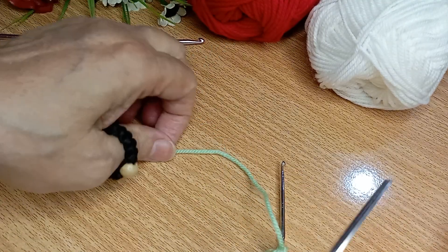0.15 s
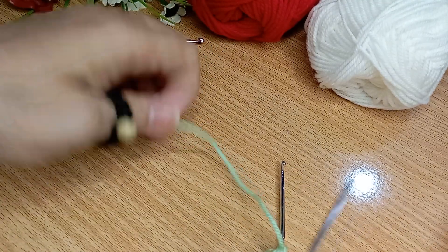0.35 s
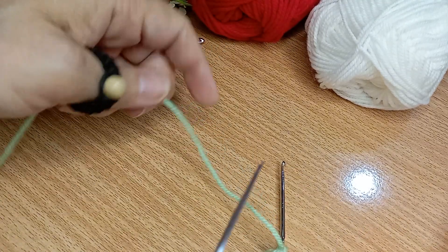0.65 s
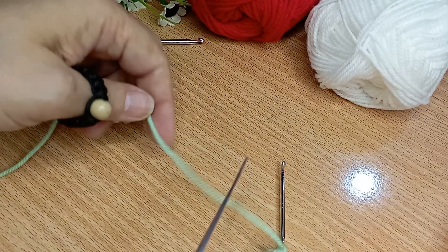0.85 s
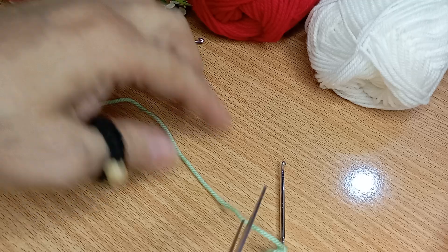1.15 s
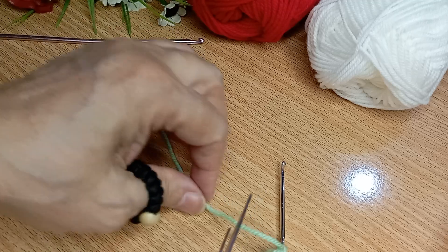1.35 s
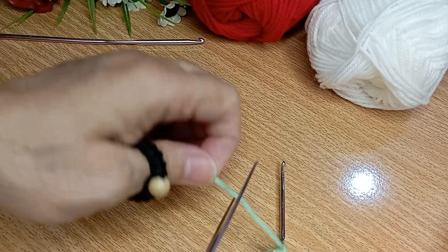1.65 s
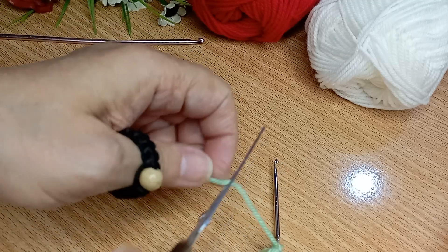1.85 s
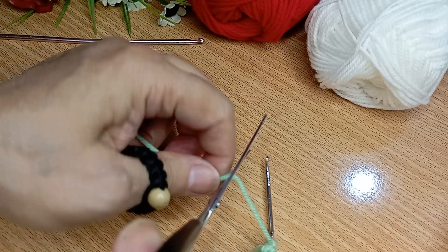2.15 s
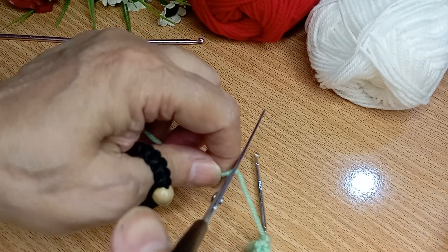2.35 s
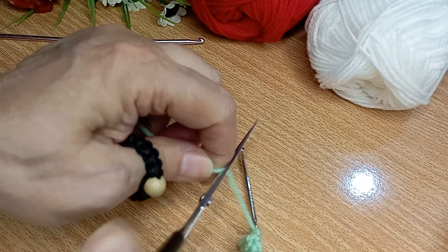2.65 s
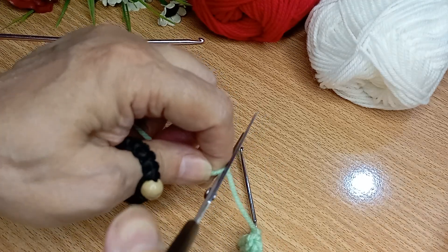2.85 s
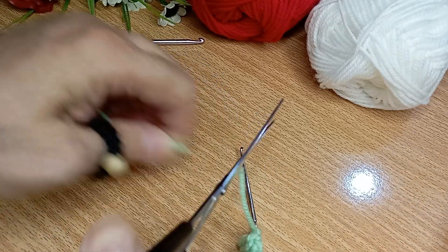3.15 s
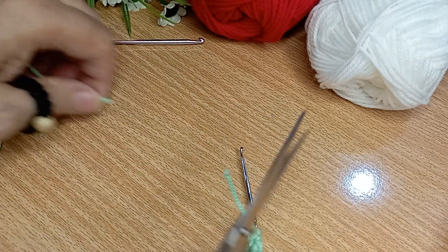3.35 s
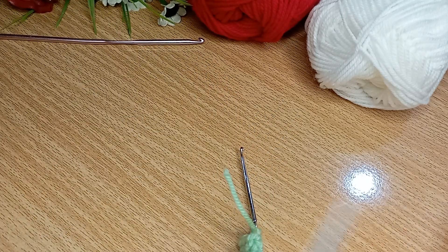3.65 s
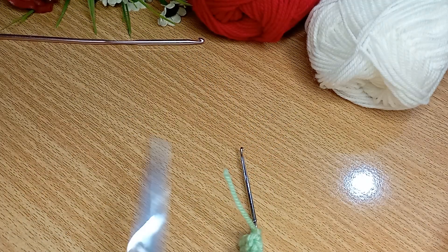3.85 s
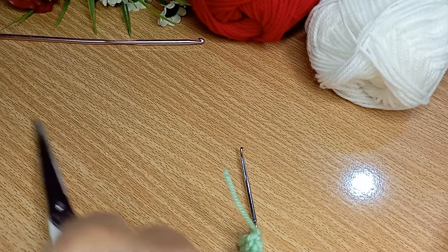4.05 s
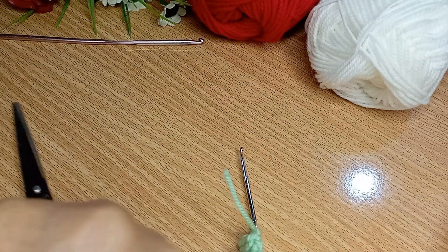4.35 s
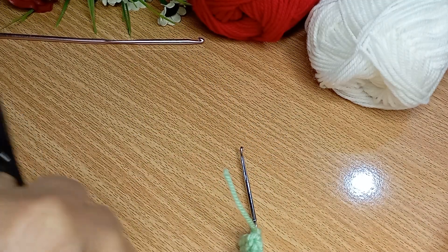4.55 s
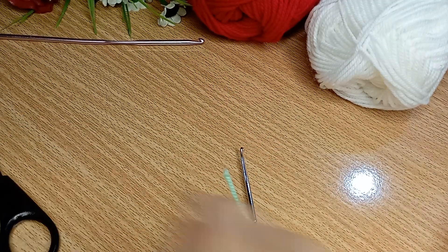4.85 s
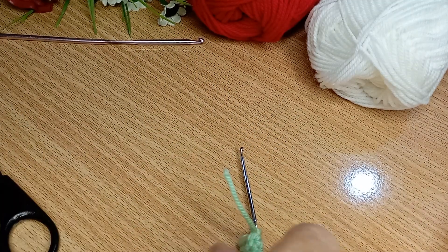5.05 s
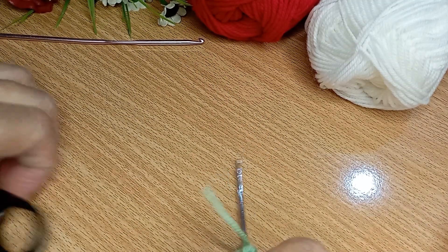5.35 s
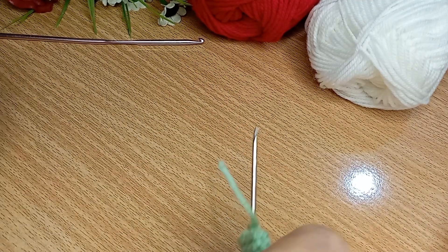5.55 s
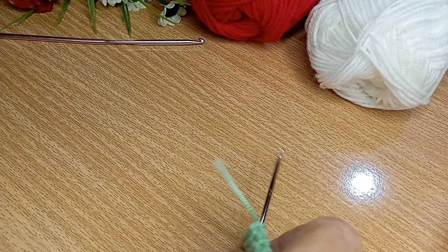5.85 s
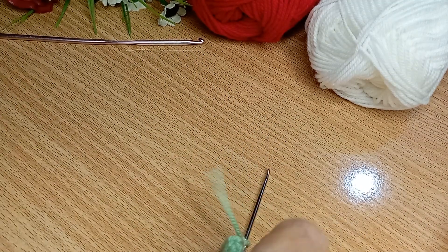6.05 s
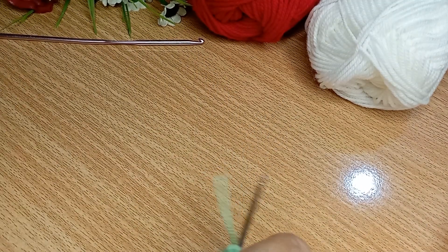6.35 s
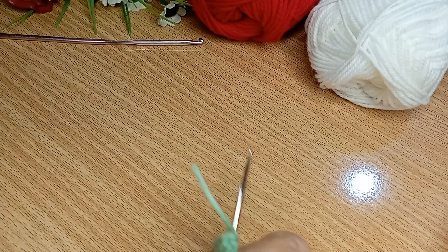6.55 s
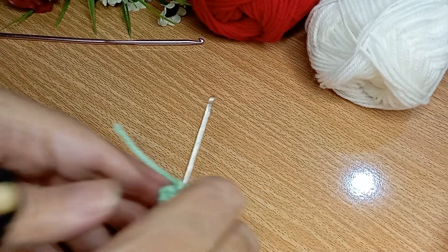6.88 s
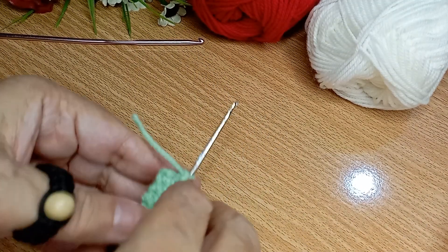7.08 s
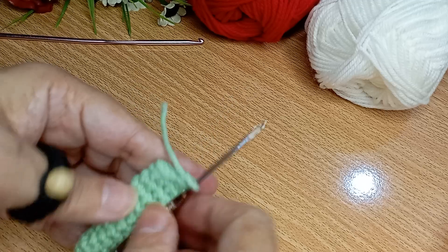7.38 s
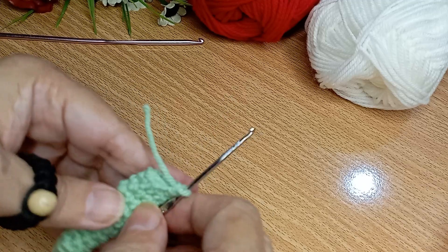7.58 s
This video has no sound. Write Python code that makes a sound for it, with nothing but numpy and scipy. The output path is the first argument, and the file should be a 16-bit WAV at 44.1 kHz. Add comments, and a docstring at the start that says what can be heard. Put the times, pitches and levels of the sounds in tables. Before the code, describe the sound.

A close stereo microphone hears a wooden tabletop in a small, hard-walled room with dull air noise and a steady low hum. Two soft muffled bumps come at about 0.1 s, then low hand brushing until 1.4 s, with barely audible blade ticks from 0.5 s. Clearer, thin, dry scissor snips come at 2.45 s, with weaker clicks to 3.3 s and another crisp one at 3.65 s. The scissors clack onto wood at 4.05 and 4.35 s, steel bright over a woody knock. A short rub leads into the loudest sharp clatter at 5.15 to 5.4 s. A steel hook taps and bounces at 5.9, 6.0, 6.3, 6.45 and 6.55 s, with a brief hiss of fibre near 6.0 s. Fainter touches follow, then a softer tap at 7.35 s, a quick wool rub, and a second low tone swelling from 7 s to the end.

```python
"""Scissors, yarn and a hook on a wooden table

Small scissors snip yarn, then are put down; a steel crochet hook clatters on the table; hands and wool rub.
Contacts are damped noise bursts through steel and wood colours, with bounces and ringing modes; rubbing and
brushing are noise shaped by smooth strokes. A close stereo microphone hears them in a small, hard-walled
room, over dull room noise, a low hum and a second low tone that swells late."""
import sys
import numpy as np
from scipy import signal
from scipy.fft import rfft, irfft, next_fast_len
from scipy.io import wavfile
from scipy.ndimage import map_coordinates

SR = 44100
rng = np.random.default_rng(int(sys.argv[2]) if len(sys.argv) > 2 else 0)


def store_wav(level_fs):
    """Save 16-bit WAV to argv[1]."""
    pcm = np.round(np.clip(np.atleast_2d(level_fs), -1, 1) * 32767)
    wavfile.write(sys.argv[1], SR, pcm.T.astype(np.int16))


N = 340452
TIME = np.arange(N) / SR

# Bright colour of steel in contact. Each row: frequency in Hz, relative level in dB.
STEEL = [(3500, -69.5), (5500, -23.5), (7000, -14), (8800, -10), (9900, -5), (10500, -5), (11200, -3.5),
         (12000, -11.5), (14000, -17), (16000, -24)]
# Middle colour of the rattling tool body. Each row: frequency in Hz, relative level in dB.
BODY = [(600, -35), (1100, -31.5), (1500, -2.5), (2100, -6), (3000, -4), (4400, -9), (5700, -6.5),
        (7500, -33.5), (11000, -56.5)]
# How alike left and right are in the room. Each row: frequency in Hz, likeness (1 is identical).
ROOM_ALIKE = [(150, 0.96), (500, 1), (1200, 0.51), (16000, 0)]


def amp(db):
    """Decibels to gain."""
    return 10 ** (np.asarray(db) / 20)


def unit(x):
    """x at rms 1."""
    return x / np.sqrt(np.mean(x ** 2) + 1e-20)


def along(points, hz):
    """(Hz, value) points read on a log frequency axis."""
    point_hz, values = np.transpose(points)
    return np.interp(np.log(hz + 1), np.log(point_hz + 1), values)


def wobble(rate):
    """A smooth random curve with the given number of knots a second."""
    knots = rng.standard_normal(int(N * rate / SR) + 4)
    return map_coordinates(knots, [TIME * rate])


def filtered(x, response):
    """x times a complex response of frequency."""
    n = x.shape[-1]
    padded = next_fast_len(n + 4096)
    spectrum = rfft(x, padded) * response(np.fft.rfftfreq(padded, 1 / SR))
    return irfft(spectrum, padded)[..., :n]


def coloured(x, spectrum, size=2048):
    """x through a causal, minimum-phase filter with the given spectrum."""
    gain = amp(along(spectrum, np.fft.rfftfreq(size, 1 / SR)))
    cepstrum = irfft(np.log(gain))
    # folding the cepstrum forward puts the filter's energy at its start
    cepstrum[1:size // 2] *= 2
    cepstrum[size // 2 + 1:] = 0
    impulse = irfft(np.exp(rfft(cepstrum)))
    return signal.fftconvolve(x, impulse[None], axes=1)[:, :x.shape[1]]


def pair(n, alike):
    """White stereo noise whose left-right likeness depends on frequency."""
    def mid_side(hz):
        turn = np.arccos(np.clip(along(alike, hz), -1, 1)) / 2
        return np.array([np.cos(turn), np.sin(turn)])

    mid, side = filtered(rng.standard_normal((2, n)), mid_side)
    return np.array([mid + side, mid - side])


def rush(spectrum, alike):
    """Steady coloured stereo noise of rms 1."""
    return unit(filtered(pair(N, alike), lambda hz: amp(along(spectrum, hz))))


def swell(t, length, rise_share):
    """A smooth stroke, loudest at t = 0, with its own shares of rise and fall."""
    side_length = length * np.where(t < 0, rise_share, 1 - rise_share)
    return np.exp(-2 * (t / side_length) ** 2)


def add(track, s, sound):
    """Mix a sound into the track at s seconds."""
    start = max(round(s * SR), 0)
    track[:, start:start + sound.shape[1]] += sound[:, :max(N - start, 0)]


def resonance(f, hz, width):
    """Causal response of one mode, 1 at its centre; width in Hz."""
    return 1j * f * width / (hz * hz - f * f + 1j * f * width)


def peaked(x, hz, width, boost_db):
    """x with one mode standing out; same energy."""
    y = filtered(x, lambda f: 1 + amp(boost_db) * resonance(f, hz, width))
    return y * np.linalg.norm(x) / np.linalg.norm(y)


def in_room(x, wet_db, gap=0.0016):
    """x followed by the walls' answer, each frequency dying at its own speed."""
    # Decay of the room. Each row: frequency in Hz, time to fall 60 dB in seconds.
    room_decay = [(120, 0.23), (300, 0.77), (800, 0.3), (2000, 0.5), (5000, 0.39), (10000, .33),
                  (16000, 0.2)]
    hz, t, cells = signal.stft(pair(SR // 2, ROOM_ALIKE), SR, nperseg=256)
    decay = amp(-60 * t / along(room_decay, hz)[:, None])
    tail = signal.istft(cells * decay, SR, nperseg=256)[1]
    # the answer builds up over about gap seconds
    tail *= 1 - np.exp(-(np.arange(tail.shape[1]) / SR / gap) ** 2)
    tail /= np.linalg.norm(tail[0])
    return x + amp(wet_db) * signal.fftconvolve(x, tail, axes=1)[:, :x.shape[1]]


def placed(x, pan_db, lead=0.0002133):
    """The table lies a little to the left, so the left port hears it lead seconds earlier."""
    sides = np.array([[.5], [-.5]])
    delayed = filtered(x, lambda hz: np.exp(-2j * np.pi * hz * lead * (.5 - sides)))
    return amp(sides * pan_db) * delayed


def burst(spectrum, t60, first_db):
    """A sharp first touch and the dense, heavily damped modes that it starts; energy 1."""
    # How alike left and right are close to a contact. Each row: frequency in Hz, likeness.
    contact_alike = [(300, 0.89), (900, 0.32), (3000, 0.092), (12000, 0.083)]
    t = np.arange(SR // 2) / SR
    modes = pair(len(t), contact_alike) * amp(-60 * t / t60)
    touch = amp(first_db) * (t == 0)
    x = coloured(modes / np.linalg.norm(modes) + touch, spectrum)
    return x / np.linalg.norm(x)


def clacks():
    """Each contact cracks in the steel, rattles its body, knocks the table top and thuds in its frame."""
    # Colour of the struck table top. Each row: frequency in Hz, relative level in dB.
    wood_colour = [(150, -45.5), (370, 5.5), (500, 1), (680, 5), (950, -6), (1400, -8.5), (2000, -18.5),
                   (3500, -52.5)]
    # Colour of the thud in the table's frame. Each row: frequency in Hz, relative level in dB.
    thud_colour = [(35, -9.5), (70, -6.5), (130, 3.5), (190, 4), (300, -1.5), (420, -8.5), (700, -11),
                   (2000, -78.5)]
    track = np.zeros((2, N))
    for s, edge_db, body_db, knock_db, thud_db, hz in contacts():
        spot, side = rng.standard_normal(2)
        crack = amp(edge_db + 0.5) * burst(STEEL, t60=0.022, first_db=-15.5)
        rattle = amp(body_db) * burst(BODY, t60=0.042, first_db=-8.5)
        # the reflection's delay in seconds differs from spot to spot
        delay = 0.000411 * np.exp(0.32 * spot)
        steel = off_table(crack + rattle, strength=0.3, delay=delay) + amp(edge_db - 17) * ring()

        # the spot that is struck decides which mode of the top answers most; higher modes stand out more
        boost_db = -0.5 + 4 * np.log2(hz / 500)
        top = peaked(burst(wood_colour, t60=0.039, first_db=-4.0), hz, width=hz / 5.6, boost_db=boost_db)
        thud = burst(thud_colour, t60=0.037, first_db=-1.5)
        table = amp(knock_db + 1) * top + amp(thud_db) * thud

        # left minus right: 0.5 dB on average, scattered by 2.7 dB from blow to blow
        add(track, s, placed(in_room(steel, wet_db=-9.0), pan_db=0.5 + 2.7 * side))
        add(track, s, placed(in_room(table, wet_db=-5.0), pan_db=1.5, lead=0.00017))
    return track


def contacts(count=3):
    """Every landing grazes, hits and bounces, each time sooner and weaker."""
    # Scissors, hook and hand landing on the table. Each row: hit in seconds, relative levels of steel, rattle,
    # knock and thud in dB, knock resonance in Hz, first flight in seconds, loss a bounce in dB.
    landings = [(0.0765, -35, -32, -22, -6.5, 330, .012, 19), (0.087, -22, -25, -16.5, -3.5, 300, .01, 12),
                (4.057, -1, -10, -7.5, -4, 770, 0.017, 5.5), (4.1152, -7, -11.5, -10, -27, 693, 0.009, 24),
                (4.3573, 2.5, -4, -3.5, -1, 890, 0.013, 13.5),
                (5.1375, -30, -28, -16.5, -7, 330, 0.013, 15), (5.1818, -11, -16, -6, 0.5, 403, 0.0046, 2),
                (5.23, 10.5, 1.5, 1.5, -1.5, 1110, 0.0086, 18),
                (5.3848, 1.5, -10, -6.5, -4.5, 344, .012, 9), (5.9203, -0.5, -7, -5, -11, 520, 0.012, 20),
                (5.9723, 5.5, -4.5, -3.5, -4.5, 1500, 0.028, 10),
                (6.1169, -20.5, -20, -21.5, -18, 414, .01, 20), (6.273, 5, -2.5, -5, -2, 780, .044, 6.5),
                (6.4357, -3.5, -7, -8, -7.5, 1530, .012, 7), (6.5369, 6, -2.5, -5, -1, 845, .0278, 3.5),
                (6.8128, -15.5, -23, -20, -22, 513, 0.012, 0.5),
                (6.9356, -26, -29, -26, -43.5, 490, 0.013, 3.5),
                (7.343, -4.5, -11, -13.5, -11, 494, .0285, 2.5)]
    graze_s, graze_db = .003, -27  # the steel grazes the table just before it lands
    shrink = 0.78  # each flight over the one before
    extra_loss_db = np.array([0, 0, 0, 1.5])  # the thud loses more a bounce
    for s, steel, rattle, knock, thud, hz, flight, loss in landings:
        levels = np.array([steel, rattle, knock, thud])
        yield s - graze_s, *(levels + graze_db), hz
        for k in range(count):
            yield s, *(levels - k * (loss + extra_loss_db)), hz
            s += flight * shrink ** k


def off_table(x, strength, delay):
    """x plus its reflection from the table top, which cuts notches into it; same energy."""
    y = filtered(x, lambda hz: 1 + strength * np.exp(-2j * np.pi * hz * delay))
    return y * np.linalg.norm(x) / np.linalg.norm(y)


def ring(scatter_db=4):
    """The steel's lasting modes as decaying sines, at new strengths for every blow; energy 1."""
    # Each row: mode in Hz, relative level in dB before scatter, time to fall 60 dB in seconds.
    ring_modes = [(3220, 3.5, 0.073), (3870, 6.5, 0.096), (5340, 2, .2), (8380, -13.5, .15),
                  (8800, 19.5, 0.053), (9470, -17.5, .18), (10800, -7, 0.332), (10830, 5, 0.092),
                  (10460, -13, 0.21), (14110, -35.5, 0.13)]
    t = np.arange(SR // 2) / SR
    x = np.zeros((2, len(t)))
    for hz, db, t60 in ring_modes:
        level_db = db + scatter_db * rng.standard_normal()
        phase = rng.random((2, 1))  # in turns, one for each channel
        x += amp(level_db - 60 * t / t60) * np.sin(2 * np.pi * (hz * t + phase))
    return x / np.linalg.norm(x)


def snips():
    """The blades tick against each other, damped by the fingers; where they touch sets their resonance."""
    # Blades touching and closing on the yarn. Each row: start in seconds, relative level of the edge in dB,
    # relative level of the body in dB, blade resonance in Hz.
    snip_moments = [(0.501, -43, -37.5, 2520), (0.755, -33.5, -35, 6360), (1.0081, -33, -39.5, 3150),
                    (1.282, -32, -43, 3490), (2.452, -15.5, -32, 6700), (2.5832, -28, -40, 7190),
                    (2.685, -28.5, -31.5, 2520), (2.7281, -34, -43, 6740), (2.8567, -27.5, -36, 2770),
                    (3.0577, -37, -30, 3870), (3.3242, -37, -52, 7190), (3.6432, -16, -28.5, 6300)]
    # Colour of the thin blade edges. Each row: frequency in Hz, relative level in dB.
    blade_colour = [(2500, -21), (5000, -38), (6500, -3.5), (8500, -3), (10000, 3.5), (11300, -2.5),
                    (12200, -6), (13400, -4), (14500, -9), (16000, -13.5)]
    track = np.zeros((2, N))
    for s, edge_db, body_db, hz in snip_moments:
        tick = burst(blade_colour, t60=0.021, first_db=-46)
        ping = peaked(burst(BODY, t60=0.026, first_db=0), hz, width=140, boost_db=10.0)
        blades = amp(edge_db) * tick + amp(body_db) * ping
        add(track, s, placed(in_room(blades, wet_db=-14.0), pan_db=3))
    return track


def rubbing():
    """Fibres catch and slip under each stroke and make the steel sing faintly."""
    # Wool, skin and steel sliding. Each row: loudest moment in seconds, length in seconds,
    # relative level of hiss in dB, relative level of scrape in dB, leading resonance in Hz.
    strokes = [(1.354, 0.057, -55, -62.5, 6860), (2.353, 0.049, -75, -70, 2920),
               (2.422, 0.064, -56.5, -67, 13300), (2.688, 0.076, -66, -70, 3100),
               (2.96, 0.095, -70, -84, 12900), (3.085, 0.042, -62, -79, 3800), (3.63, .022, -59, -62, 4200),
               (4.622, 0.2, -55, -60.5, 3460), (5.194, 0.048, -38.5, -45, 2820),
               (5.515, 0.11, -60.5, -61.5, 2960), (5.638, 0.13, -70.5, -63, 1510),
               (6.023, 0.076, -35.5, -63, 1490), (6.971, 0.085, -48, -55.5, 3000),
               (7.185, 0.2, -68, -71, 2950), (7.416, 0.037, -37, -46, 3300),
               (7.702, 0.12, -50.5, -56, 4210)]
    # Modes that every stroke excites. Each row: frequency in Hz, level in dB relative to the singing.
    singing_modes = [(1500, -6.5), (2900, -12.5), (5700, -5), (10000, -11)]
    singing_db, lead_db, width_hz = 12, 3, 260
    track = np.zeros((2, N))
    t = np.arange(SR // 2) / SR - 1 / 4
    for s, length, hiss_db, scrape_db, lead_hz in strokes:
        excited = list(singing_modes) + [(lead_hz, lead_db)]

        def modes(f):
            return 1 + sum(amp(singing_db + db) * resonance(f, hz, width_hz) for hz, db in excited)

        def friction(colour):
            return unit(filtered(coloured(pair(len(t), ROOM_ALIKE), colour), modes))

        stroke = amp(hiss_db) * friction(STEEL) + amp(scrape_db) * friction(BODY)
        add(track, s + t[0], swell(t, length, rise_share=0.57) * stroke)
    # fine grain and slower catches, in dB
    grain_db = 3.0 * wobble(400)
    catch_db = 2.5 * wobble(60)
    return in_room(track * unit(amp(grain_db + catch_db)), wet_db=-7.5)


def brushing():
    """The hand's weight rumbles in the wood as it moves: low noise under smooth swells."""
    # The hand brushing the table. Each row: loudest moment in seconds, length in seconds, level in dB.
    brushes = [(0.265, 0.14, -48), (0.446, 0.32, -50), (1.012, 0.054, -41), (1.266, 0.27, -46.5),
               (7.0, 0.13, -53.5)]
    weight = sum(amp(db) * swell(TIME - s, length, rise_share=0.36) for s, length, db in brushes)
    # each point: Hz, relative dB
    rumble = [(70, -77), (170, 6), (250, 0.5), (450, -14.5), (1500, -36.5), (4000, -53)]
    return weight * rush(rumble, ROOM_ALIKE)


def background():
    """Dull room noise, a steady hum and a second tone that swells late."""
    # Colour of the room noise. Each row: frequency in Hz, relative level in dB.
    air_colour = [(25, -41), (38, -11.5), (48, -12.5), (62, -10), (74, -4), (125, -6.5), (185, -3.5),
                  (290, -7), (390, -11.5), (550, -20.5), (800, -21), (1600, -30.5), (4200, -47.5),
                  (10500, -44), (16000, -52)]
    # How alike left and right are in that noise. Each row: frequency in Hz, likeness.
    air_alike = [(60, 0.83), (180, 1), (550, 0.45), (1650, -0.17), (4970, -0.017), (15000, -0.42)]
    # Steady hum lines. Each row: frequency in Hz, level in dB before the left-right balance.
    hum_lines = [(100, -50.5), (228, -60.5), (383, -66.5)]
    # The second tone's swell. Each row: time in seconds, level in dB.
    drone_swell = [(6.9, -77), (7.2, -51), (7.5, -49), (7.72, -48.5)]
    # noise and hum are a little stronger on the right
    air = amp(-50) * rush(air_colour, air_alike) * amp([[-.4], [.4]])
    hum = sum(tone(hz, db) for hz, db in hum_lines) * amp([[-.8], [.8]])
    drone = tone(156, np.interp(TIME, *np.transpose(drone_swell)))
    return air + hum + drone


def tone(hz, db, drift=0.11):
    """A sine of the given rms level whose phase wanders slightly, by drift in radians."""
    phase = 2 * np.pi * hz * TIME + drift * wobble(2.2)
    return np.sqrt(2) * amp(db) * np.sin(phase)


def scene():
    """All sounds at the table, over the room's noise."""
    return clacks() + snips() + rubbing() + brushing() + background()


def record(dry):
    """The recorder cuts the deepest rumble and keeps nothing above its band limit."""
    low_hz, top_hz = 41, 16100

    def band(hz):
        rumble_cut = 1 + (low_hz / (hz + 1)) ** 24
        top_cut = 1 + (hz / top_hz) ** 160
        return 1 / np.sqrt(rumble_cut * top_cut)

    return filtered(dry, band)


dry = scene()
out = record(dry)
store_wav(out)
```